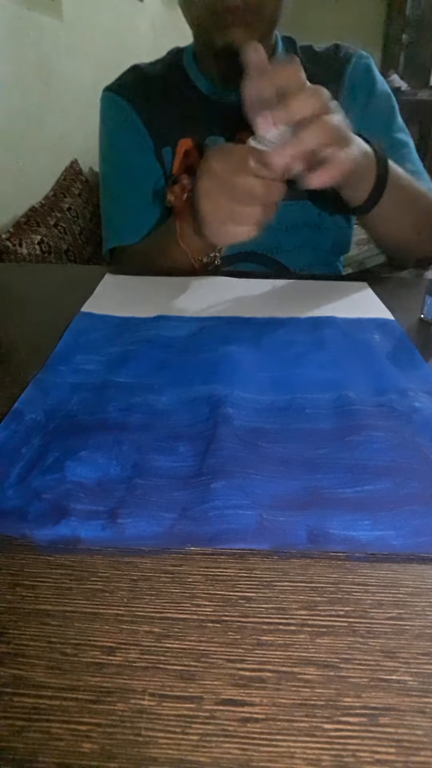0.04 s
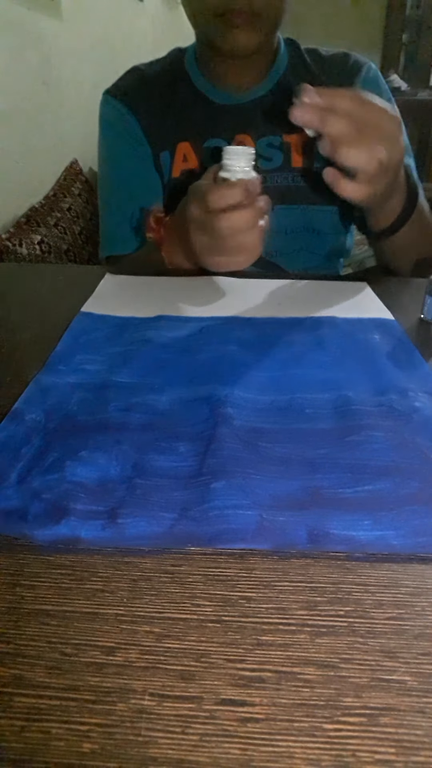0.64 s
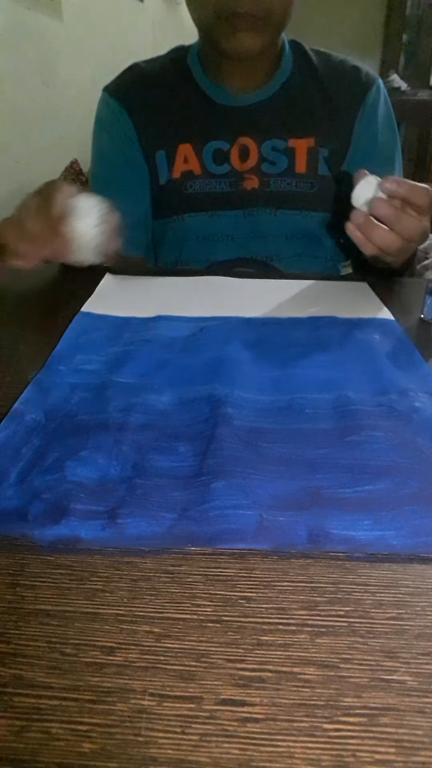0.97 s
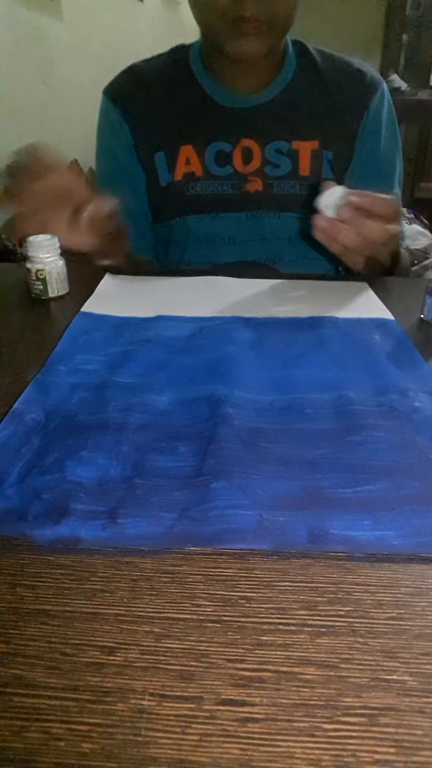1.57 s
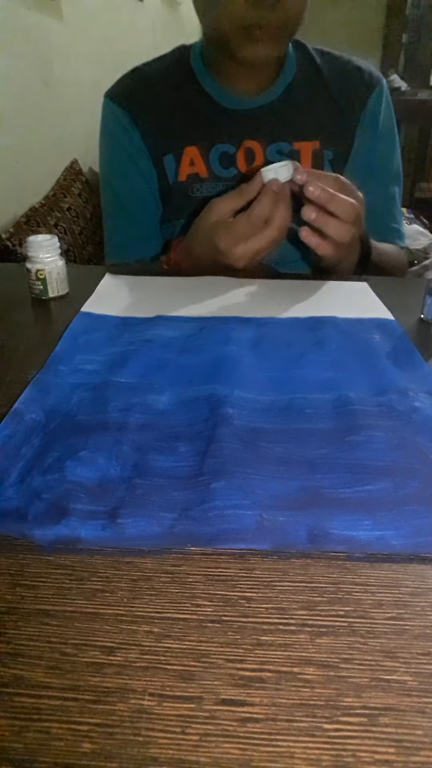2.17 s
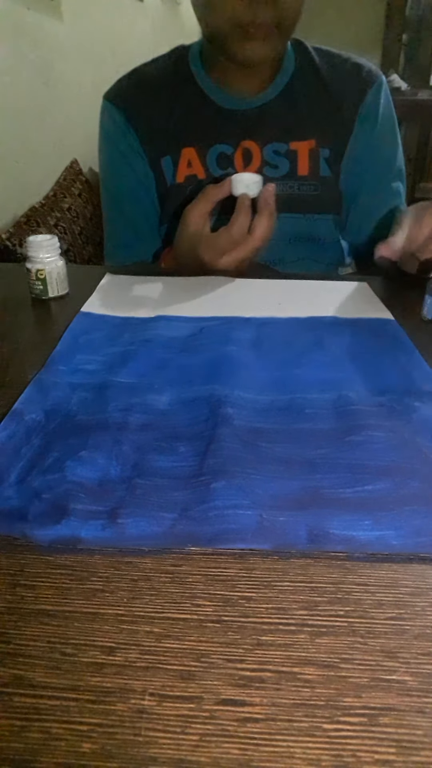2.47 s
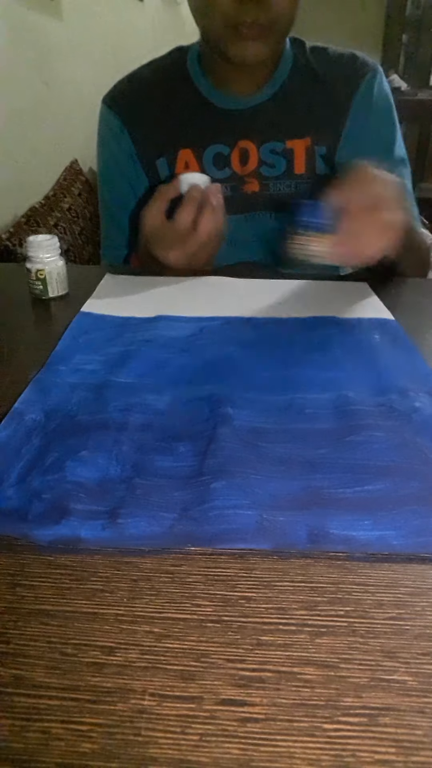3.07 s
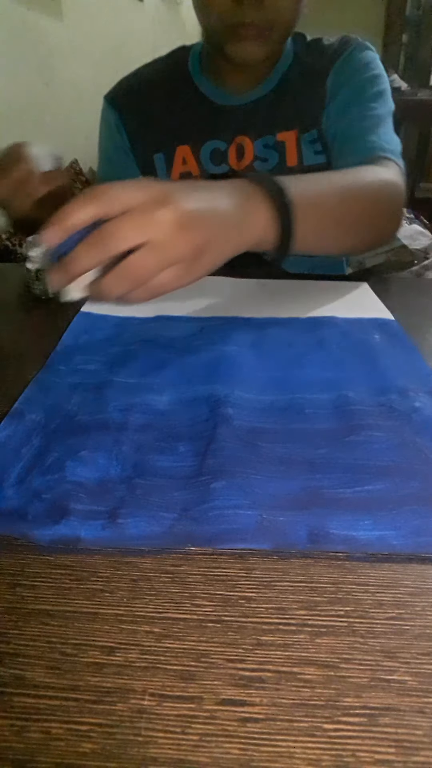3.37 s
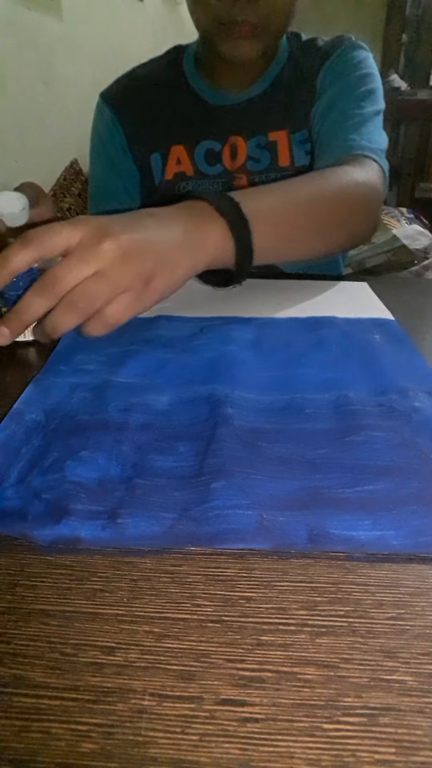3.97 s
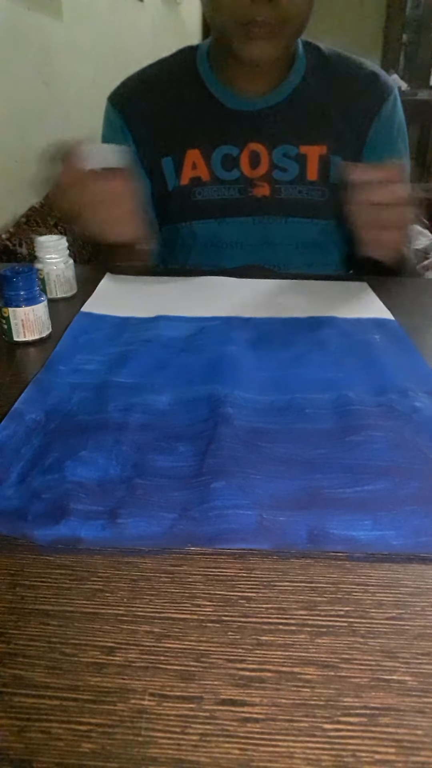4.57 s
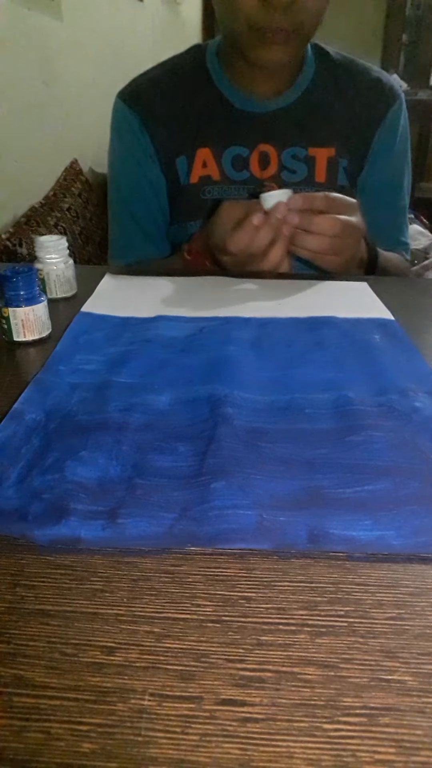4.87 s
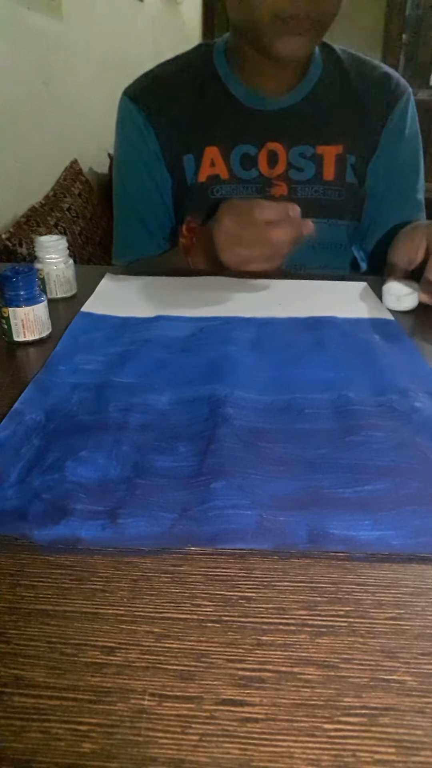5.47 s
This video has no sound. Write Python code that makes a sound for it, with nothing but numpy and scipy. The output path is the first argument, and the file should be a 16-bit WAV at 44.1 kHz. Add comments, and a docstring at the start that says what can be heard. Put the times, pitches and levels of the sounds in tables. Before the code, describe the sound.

Small paint bottles knock and slide on a wooden table, then a plastic cap clicks down, over a humming fan.

```python
"""Small paint bottles are set down and slid about on a wooden table; a plastic cap drops beside them.
Each touch makes the table top or the cap ring, and a sliding bottle sticks and slips in tiny jerks.
Fingers rub on the cap, and a fan hums in the small room.
An automatic volume control turns the sound down after the hard knocks and lets it creep back up."""
import sys
import numpy as np
from scipy import signal
from scipy.fft import rfft, irfft
from scipy.io import wavfile
from scipy.ndimage import uniform_filter1d

SR = 44100
rng = np.random.default_rng(int(sys.argv[2]) if len(sys.argv) > 2 else 0)


def store_wav(level_fs):
    """Save 16-bit WAV to argv[1]."""
    pcm = np.round(np.clip(np.atleast_2d(level_fs), -1, 1) * 32767)
    wavfile.write(sys.argv[1], SR, pcm.T.astype(np.int16))


N = 252693
TIME = np.arange(N) / SR
RING_TIME = TIME[:2 ** 14]   # long enough for one touch to die away

# The dense ring of wood and room after a touch. Each row: pitch in Hz, relative level in dB.
WOOD_TAIL_COLOUR = [(100, -3.5), (330, -0.5), (700, -2), (1100, 0.5), (1450, -11.5), (1800, -0.5),
                    (3100, -11), (4900, -11), (7200, -12.5), (8400, -39.5), (15000, -14)]


def bottle_knocks(gap_s=.0105, jitter_s=.001, loss_db=7.5, softening=0.063, tick_loss_db=14.5):
    """A bottle lands on its edge and may rock flat in a few quick touches, ever weaker and softer."""
    # Each row: start and rocking time in seconds, level in dB, treble limit, bass limit and
    # the pitch this spot favours in Hz, the bottle's own tick in dB relative to the level.
    landings = [(1.1125, 0.062, -10, 2780, 470, 1170, -21.5), (1.4190, 0.0041, -3, 2230, 420, 1170, -23.5),
                (3.6757, 0.025, -11, 1900, 270, 335, -21.5), (3.7646, 0, -14.5, 1420, 230, 387, -24),
                (3.845, 0.024, -35.5, 1200, 500, 970, -42), (3.991, 0.004, -19.5, 1500, 251.5, 387, -28)]
    out = np.zeros(N)
    for start, rock_s, db, treble_hz, bass_hz, spot_hz, tick_db in landings:
        steps = np.linspace(0, 1, 1 + int(round(rock_s / gap_s)))
        delays = steps * rock_s + (steps > 0) * jitter_s * rng.standard_normal(len(steps))
        for delay, progress in zip(delays, steps):
            softened_hz = treble_hz * (1 - softening * progress)
            weakened_tick_db = tick_db - tick_loss_db * np.sqrt(progress)
            touch = knock(softened_hz, bass_hz, spot_hz, weakened_tick_db)
            add(out, start + delay, from_db(db - loss_db * progress ** 2) * touch)
    return out


def knock(treble_hz, bass_hz, spot_hz, tick_db, energy_s=.02):
    """One touch of a bottle: the thud of the table top and the tick of its own wall."""
    wood = favour(table_ring(), spot_hz, lift_db=0.5, width=0.09)
    thud = contact(wood, treble_hz, bass_hz, energy_s)
    tick = from_db(tick_db) * np.sqrt(energy_s * SR) * bottle_ring()
    return thud + tick


def table_ring():
    """The wooden top, with a bottle on it, rings at many pitches at once."""
    # Each row: pitch in Hz, relative level in dB, seconds to fade by 60 dB.
    tones = [(237, -23.5, 0.057), (320, -1, 0.11), (407, -8.5, 0.091), (470, -7, 0.24), (582, -3.5, 0.15),
             (627, -13.5, 0.06), (707, -3, 0.08), (778, -7.5, 0.14), (810, 4.5, 0.025), (962.6, -1, 0.091),
             (1032, 0, 0.13), (1104, -1, 0.062), (1178, 1, 0.06), (1310, -8, 0.084), (1384, -5, 0.086),
             (1632, -12, 0.082), (1660, -10, 0.044), (1733.4, -2.5, 0.091), (1966, 5, 0.037),
             (1905, -20.5, 0.18), (2320, -13.5, 0.077), (2760, -8.5, .07)]
    return ring(tones, WOOD_TAIL_COLOUR, scatter_db=3, tail_db=-6, crack_db=-10, crack_s=0.043)


def bottle_ring():
    """The bottle's stiff wall gives a short, bright ring."""
    # Each row: pitch in Hz, relative level in dB, seconds to fade by 60 dB.
    tones = [(3595, 1.5, 0.015), (4080, -4.5, 0.033), (4780, 1.5, 0.013), (4850, -5.5, 0.019),
             (5000, -4, 0.013), (6200, -25.5, .03)]
    wall = ring(tones, WOOD_TAIL_COLOUR, scatter_db=0.84, tail_db=-11, crack_db=-12, crack_s=.01)
    return energy_one(butter(butter(wall, 3000, "high"), 7600, "low"))


def bottle_slides(slips_per_s=700, uneven_db=2.5, push_db=4.5, grit_db=-22, grip_s=0.27, rasp_db=-32):
    """A bottle sticks and slips: many little jerks shake the table top and make the bottle rasp."""
    # Each row: start and end in seconds, level in dB, treble limit, bass limit and chatter pitch in Hz.
    strokes = [(1.234, 1.305, -13.5, 1220, 744, 850), (2.616, 2.664, -15.5, 866, 500, 1016),
               (2.711, 2.750, -20.5, 780, 680, 1030), (2.817, 2.938, -18.5, 900, 720, 1120),
               (4.230, 4.331, -17.5, 1400, 550, 1170)]
    out, size = np.zeros(N), len(RING_TIME)
    for start, end, db, treble_hz, bass_hz, chatter_hz in strokes:
        length_s = end - start
        progress = np.clip(RING_TIME / length_s, 0, 1)
        swell = np.maximum(np.sin(np.pi * progress), 0) ** .55
        pressure = swell * from_db(push_db * progress)   # the hand bears down
        slips = (rng.random(size) < slips_per_s / SR) * from_db(uneven_db * rng.standard_normal(size))
        force = pressure * (slips + from_db(grit_db) * rng.standard_normal(size))
        gripped = table_ring() * fade(grip_s)   # the hand damps the ring
        shake = favour(signal.fftconvolve(force, gripped), chatter_hz, lift_db=3, width=0.098)
        shake = butter(shake, 2110, "low")   # the pressed bottle smothers the treble
        scrape = contact(shake, treble_hz, bass_hz, length_s)
        rasp = energy_one(signal.fftconvolve(force, bottle_ring())) * np.sqrt(length_s * SR)
        add(out, start, from_db(db) * (scrape + from_db(rasp_db) * rasp))
    return out


def bottle_hops(start_s=2.8636, gap_s=.0335, first_db=-15, loss_db=1.23, count=3):
    """In the longest slide the bottle snags and hops along at an even pace."""
    out = np.zeros(N)
    for k in range(count):
        hop = knock(treble_hz=1058, bass_hz=714, spot_hz=1159.5, tick_db=-32.5)
        add(out, start_s + k * gap_s, from_db(first_db - k * loss_db) * hop)
    return out


def cap_taps():
    """The light plastic cap clicks down, chatters and tips flat."""
    # Each row: start in seconds, level in dB, treble limit and bass limit in Hz.
    taps = [(0.0917, -35.5, 2160, 1170), (5.4777, -11.5, 8000, 760), (5.5448, -20.5, 1150, 680),
            (5.6610, -30.5, 2770, 850)]
    # The cap on the table. Each row: pitch in Hz, relative level in dB, seconds to fade by 60 dB.
    tones = [(766, 1, 0.058), (1034, 6, 0.08), (1205, 11.5, 0.016), (1710, -1.5, 0.079), (2030, 3.5, 0.02),
             (2200, -19, 0.053), (2760, -11.5, 0.063), (3870, 0.5, 0.017), (4630, -19, 0.067),
             (5050, -12, 0.11), (6500, -32, 0.043), (7160, -4.5, 0.036)]
    # The dense ring after a tap. Each row: pitch in Hz, relative level in dB.
    tail_colour = [(300, 10), (1100, 4), (1450, 0), (2100, 5), (3100, -1), (4000, 6.5), (5100, 7.5),
                   (5900, 0), (7300, -4), (8300, -19), (15000, -14)]
    out = np.zeros(N)
    for start, db, treble_hz, bass_hz in taps + cap_bounces(taps):
        plastic = ring(tones, tail_colour, scatter_db=1.5, tail_db=-8.5, crack_db=-7, crack_s=0.014)
        add(out, start, from_db(db) * contact(plastic, treble_hz, bass_hz, energy_s=0.013))
    return out


def cap_bounces(taps, gap_s=.0136, drop_db=19, loss_db=8, bass_hz=3000, count=3):
    """Thin, dying bounces follow the cap's hardest tap; they come back as extra rows of taps."""
    start, db, treble_hz, _ = max(taps, key=lambda tap: tap[1])
    return [(start + (k + 1) * gap_s, db - drop_db - k * loss_db, treble_hz, bass_hz)
            for k in range(count)]


def finger_rubs(grain_db=4):
    """Skin on the cap or a bottle, or a passing sleeve: a thin hiss that catches in tiny grains."""
    # Each row: middle and half length in seconds, level in dB.
    rubs = [(0.224, 0.009, -53.5), (0.29, 0.064, -59.5), (0.415, 0.036, -56.5), (1.06, 0.033, -64),
            (1.28, 0.09, -53.5), (3.05, 0.078, -65), (3.65, 0.16, -66), (4.47, 0.024, -55),
            (5.05, 0.1, -65), (5.325, 0.028, -46.5), (5.616, 0.059, -63)]
    # Each row: pitch in Hz, relative level in dB.
    hiss_colour = [(1500, -1), (4900, 12.5), (7200, 5), (8300, -8), (10000, -3), (12000, -4), (14000, 2),
                   (16000, -11.5)]
    pressure = sum(from_db(db) * np.exp(-.5 * ((TIME - middle) / half) ** 2) for middle, half, db in rubs)
    grain = from_db(grain_db * wobble(500))
    return pressure * rms_one(grain * noise(hiss_colour, N))


def fan(air_db=-39.5, whine_db=-0.5, waver_db=1.5):
    """A fan makes rushing air, a throbbing drone around the mains hum and a thin motor whine."""
    # Each row: pitch in Hz, relative level in dB.
    air_colour = [(28, -49), (90, 3.5), (260, -1.5), (520, -4), (850, -7), (1200, -6.5), (1400, -12),
                  (2800, -18.5), (3050, -23), (5400, -21), (5900, -29), (7500, -31.5), (8200, -47),
                  (15000, -41)]
    # The rotor and the mains. Each row: pitch in Hz, level in dB.
    hums = [(48.3, -60.5), (100, -41.5)]
    # Each row: middle pitch and width in Hz, level in dB.
    drones = [(100.9, 19.2, -40.5), (155.7, 23, -52), (261.2, 29.5, -48.5), (452.3, 65, -48),
              (1122, 214, -49), (9100, 220, -81.5)]
    # Each row: pitch in Hz, relative level in dB.
    whines = [(1114, -49), (1163, -53), (1260, -52.5), (2514, -72), (2562, -62.5), (2708, -63), (2756, -56),
              (3289, -90.5), (4495, -63.5), (4883, -75.5), (5367, -64)]
    out = from_db(air_db) * noise(air_colour, N)
    for hz, db in hums:
        out += from_db(db) * rms_one(np.sin(2 * np.pi * hz * TIME))
    for hz, width_hz, db in drones:
        drone = butter(rng.standard_normal(N + SR), [hz - width_hz / 2, hz + width_hz / 2], "band")
        out += from_db(db) * rms_one(drone[SR:])   # skip the second in which it builds up
    for hz, db in whines:
        level = from_db(db + whine_db + waver_db * wobble(8.6))
        out += level * rms_one(np.sin(2 * np.pi * (hz * TIME + rng.random())))
    return out


def ring(tones, colour, scatter_db, tail_db, crack_db, crack_s):
    """A struck object gives tones whose strengths vary with the spot, a short crack and a dense tail."""
    hz, db, fade_s = np.transpose(tones)[:, :, None]
    strength = from_db(db + scatter_db * rng.standard_normal(hz.shape)) * rng.choice([-1, 1], hz.shape)
    ringing = np.sum(strength * np.sin(2 * np.pi * hz * RING_TIME) * fade(fade_s), axis=0)
    crack = noise(colour, len(RING_TIME)) * fade(crack_s)
    return energy_one(ringing) + from_db(tail_db) * tail(colour) + from_db(crack_db) * energy_one(crack)


def tail(colour):
    """Countless weak tones and echoes blur into noise whose bands die at their own rates."""
    # Each row: pitch in Hz, seconds to fade by 60 dB.
    band_fades = [(200, 0.3), (1000, 0.19), (2000, 0.25), (5000, 0.23), (14000, 0.087)]
    size = len(RING_TIME)
    spectrum, hz = rfft(noise(colour, size)), np.fft.rfftfreq(size, 1 / SR)
    centres, fade_times = np.transpose(band_fades)
    shares = [at_hz(np.column_stack([centres, one]), hz) for one in np.eye(len(centres))]
    bands = [irfft(spectrum * share, size) for share in shares]
    return energy_one(sum(band * fade(fade_s) for band, fade_s in zip(bands, fade_times)))


def contact(sound, treble_hz, bass_hz, energy_s):
    """Soft touches lose treble, light ones bass; the energy equals level 1 held for energy_s seconds."""
    trimmed = butter(butter(sound, treble_hz, "low"), bass_hz, "high")
    return energy_one(trimmed) * np.sqrt(energy_s * SR)


def favour(sound, hz, lift_db, width):
    """Lifts the tones near one pitch by adding a narrow band of the sound to itself."""
    return sound + from_db(lift_db) * butter(sound, hz * np.exp([-width / 2, width / 2]), "band", order=1)


def from_db(db):
    """Turns decibels into a factor to multiply by."""
    return 10 ** (np.asarray(db) / 20)


def fade(seconds):
    """A curve that falls by 60 dB in the given time."""
    return from_db(-60 * RING_TIME / seconds)


def rms_one(x):
    """Scales a sound to an average (rms) level of 1."""
    return x / np.sqrt(np.mean(x ** 2) + 1e-20)


def energy_one(x):
    """Scales a sound to a total energy of 1."""
    return x / np.sqrt(np.sum(x ** 2) + 1e-20)


def at_hz(points, hz):
    """Reads between the rows of a table, with octaves evenly spaced."""
    known_hz, values = np.transpose(points)
    return np.interp(np.log(np.maximum(hz, 1)), np.log(known_hz), values)


def butter(x, hz, kind, order=2):
    """A smooth filter that keeps the lows, the highs or one band."""
    sections = signal.butter(order, np.clip(hz, 10, SR * .45), kind, fs=SR, output="sos")
    return signal.sosfilt(sections, x)


def noise(colour, size):
    """Noise at level 1; its colour says how strong each pitch is."""
    gains = from_db(at_hz(colour, np.fft.rfftfreq(size, 1 / SR)))
    return rms_one(irfft(rfft(rng.standard_normal(size)) * gains, size))


def wobble(hz):
    """A random curve that wanders up to about hz times a second."""
    return rms_one(butter(rng.standard_normal(N), hz, "low"))


def add(out, start_s, sound):
    """Mixes a sound in at the given time."""
    start = int(round(start_s * SR))
    out[start:start + len(sound)] += sound[:N - start]


def scene():
    """Everything on and around the table, in one channel."""
    return (fan() + finger_rubs() + cap_taps() + bottle_slides() + bottle_hops() + bottle_knocks())[None]


def volume_control(x, threshold_db=-28.5, slope=1.9, deepest_db=14.5,
                   window_s=.08, attack_s=.19, hold_s=1.02, release_db_per_s=25):
    """Gain in dB: a burst of middle pitches at the output turns it down; it waits, then creeps back."""
    block = 256
    step_s = block / SR
    powers = uniform_filter1d(butter(x, [1400, 2200], "band") ** 2, block)[::block]
    heard, goal, cut, wait, cuts = 0, 0, 0, 0, []
    for power in powers:
        heard += (power * from_db(-cut) ** 2 - heard) * step_s / window_s
        heard_db = 10 * np.log10(abs(heard) + 1e-12)
        wanted = min(slope * (heard_db - threshold_db), deepest_db)
        wait -= step_s
        if wanted > goal:
            goal, wait = wanted, hold_s
        elif wait < 0:
            goal = max(goal - release_db_per_s * step_s, 0)
        cut += (goal - cut) * step_s / attack_s
        cuts.append(cut)
    return -np.interp(TIME, TIME[::block], cuts)


def record(dry, sensing_db=-1, top_hz=16000):
    """Applies the volume control, rounds off the loudest peaks and cuts the highest treble."""
    ducked = dry * from_db(volume_control(from_db(sensing_db) * dry[0]))
    rounded = ducked / (1 + ducked ** 4) ** .25
    return signal.sosfilt(signal.ellip(10, .1, 80, top_hz, fs=SR, output="sos"), rounded)


dry = scene()
out = record(dry)
store_wav(out)
```